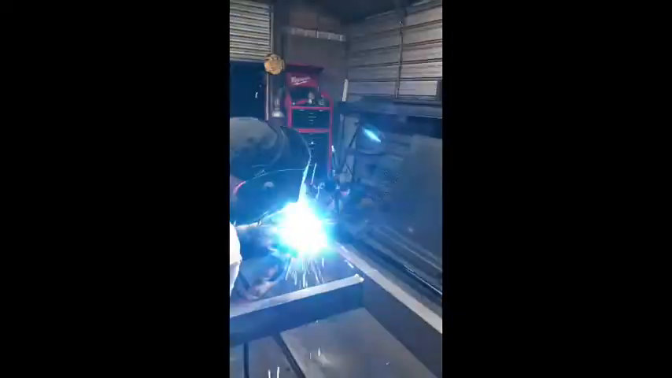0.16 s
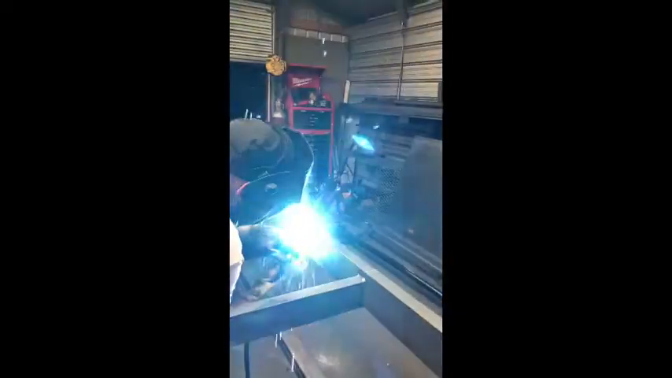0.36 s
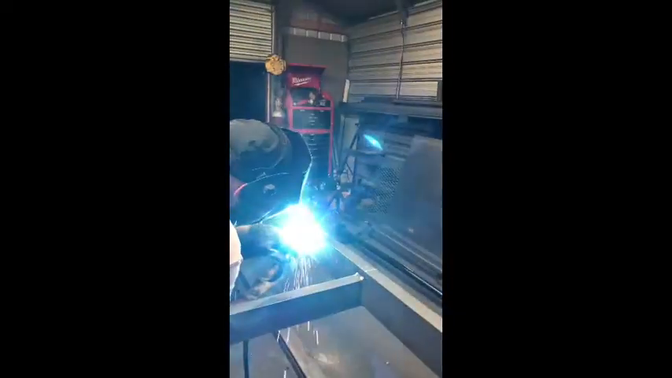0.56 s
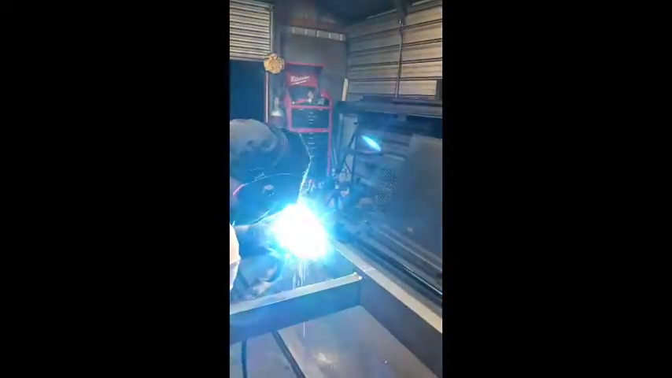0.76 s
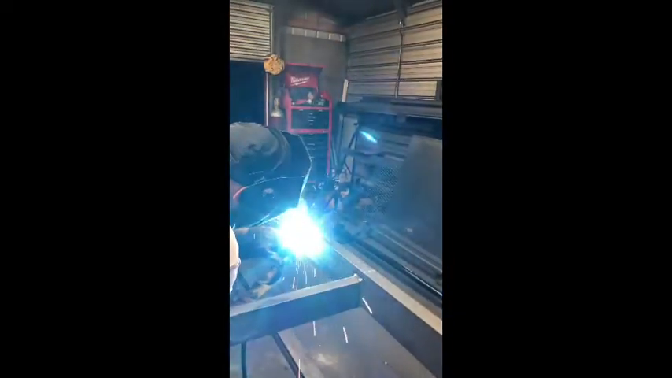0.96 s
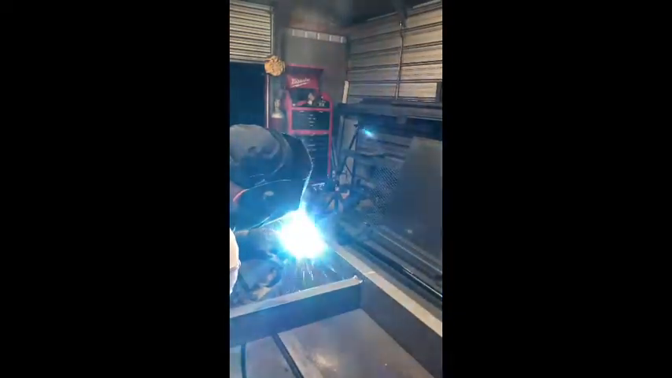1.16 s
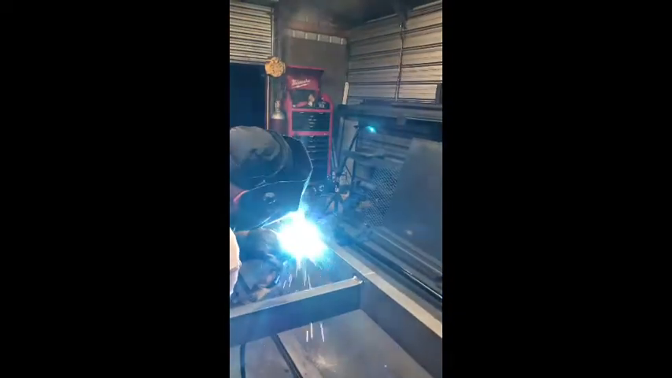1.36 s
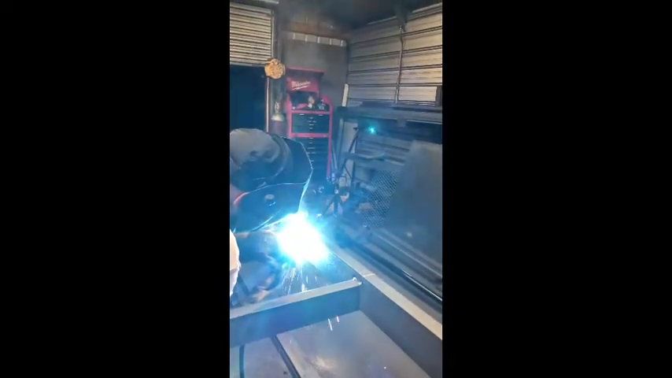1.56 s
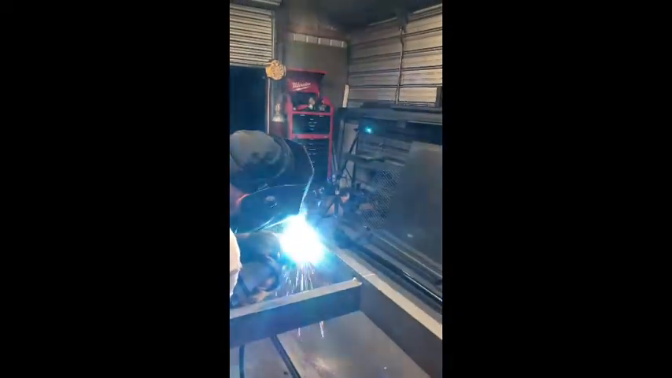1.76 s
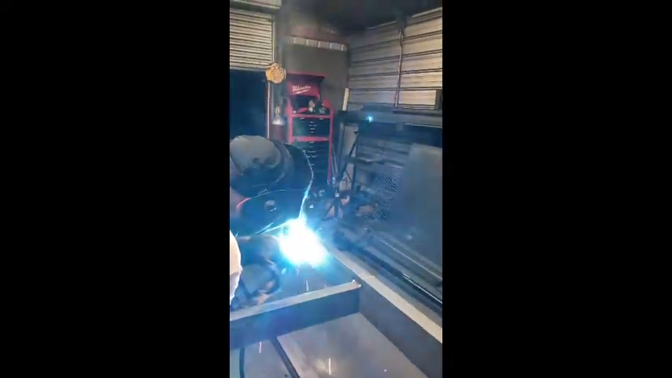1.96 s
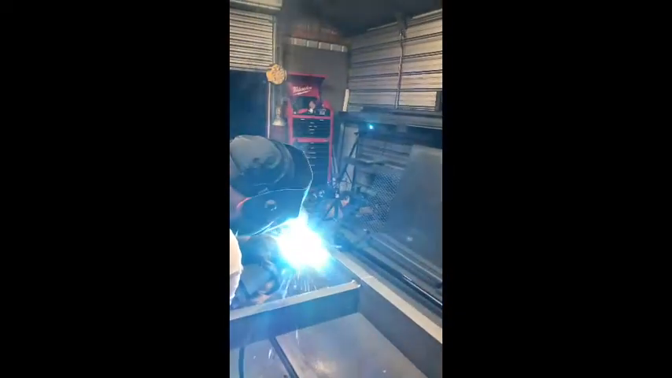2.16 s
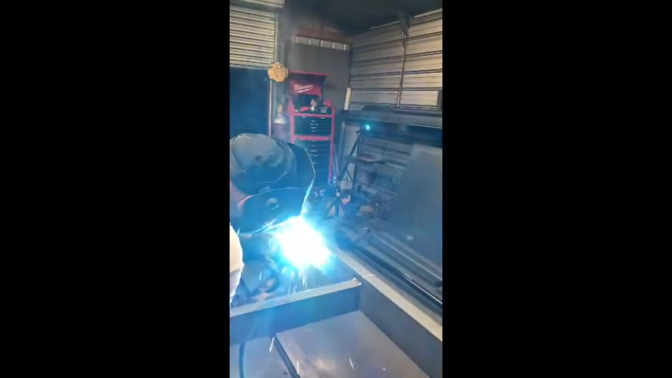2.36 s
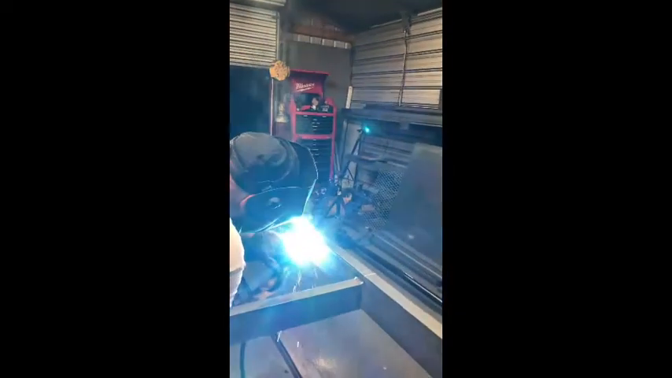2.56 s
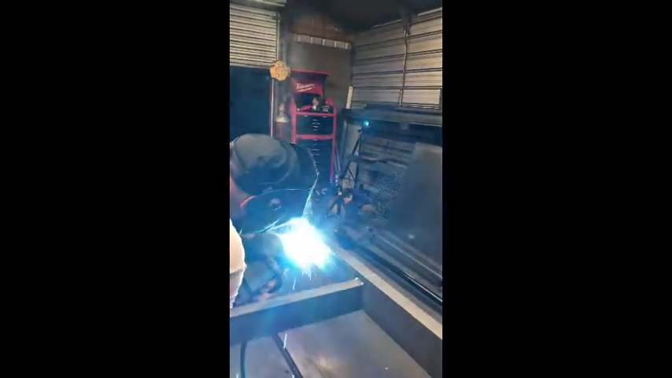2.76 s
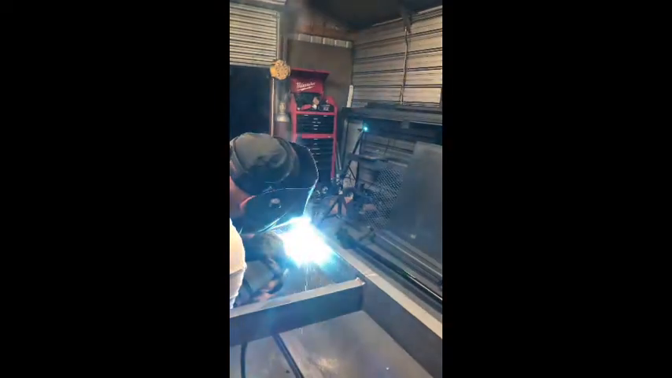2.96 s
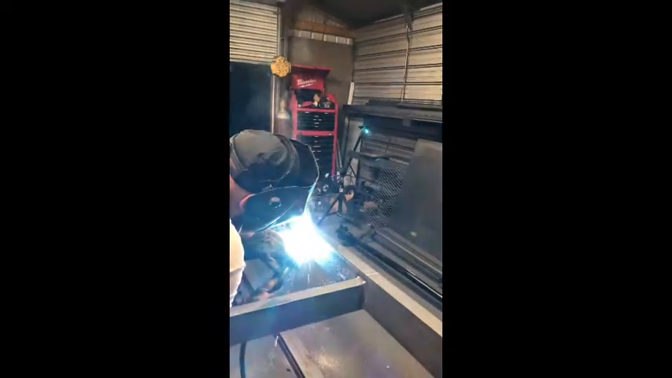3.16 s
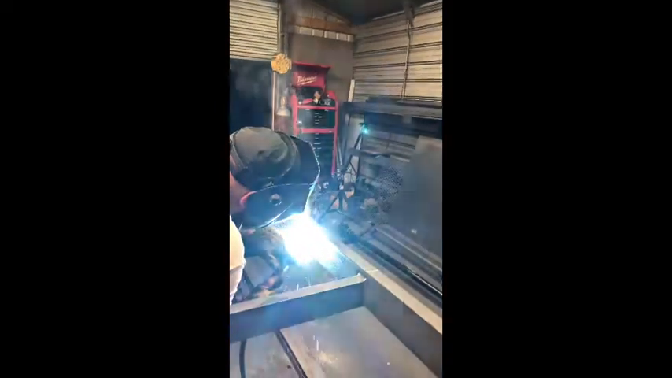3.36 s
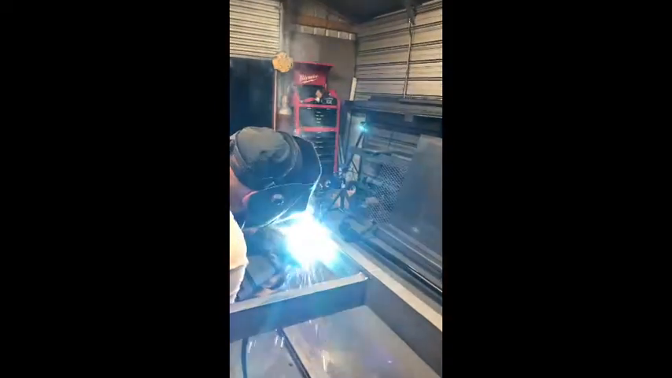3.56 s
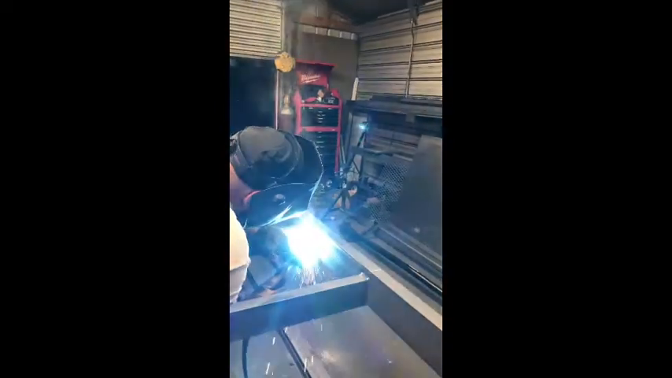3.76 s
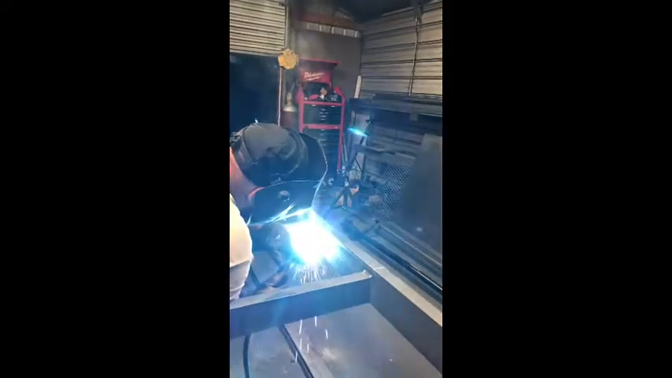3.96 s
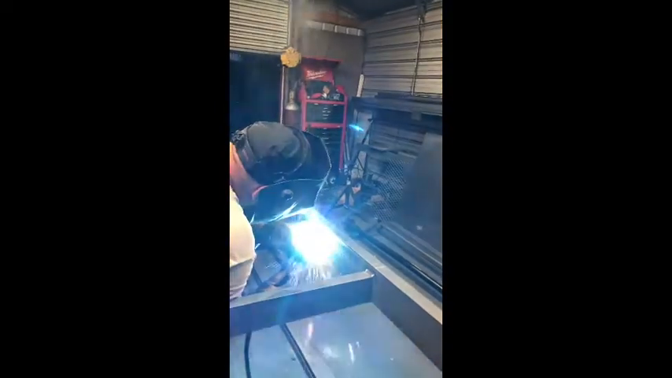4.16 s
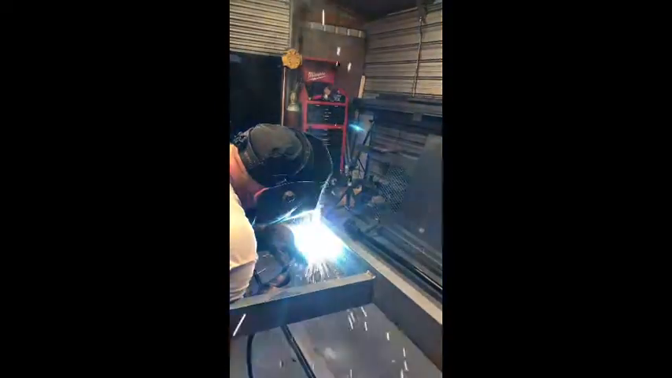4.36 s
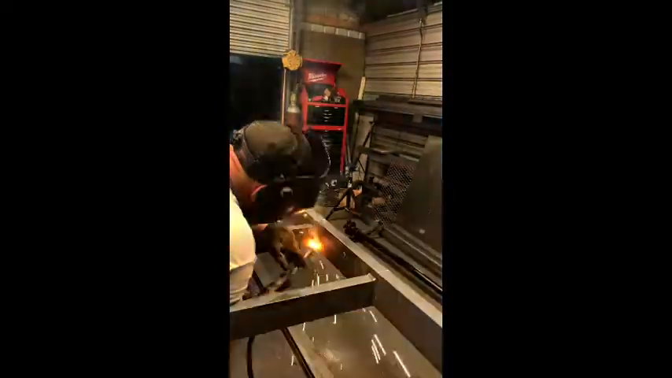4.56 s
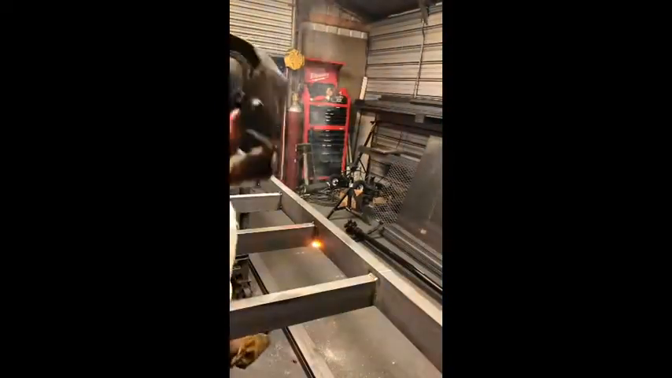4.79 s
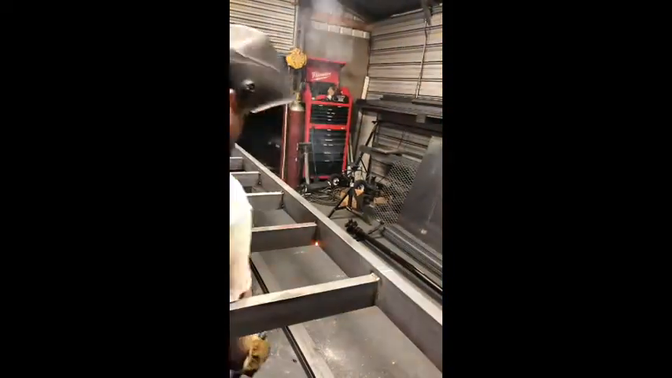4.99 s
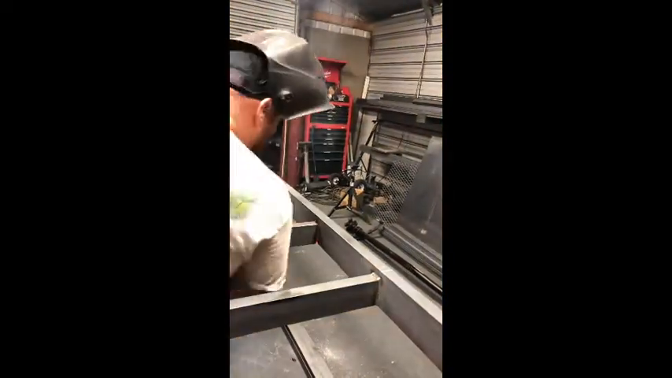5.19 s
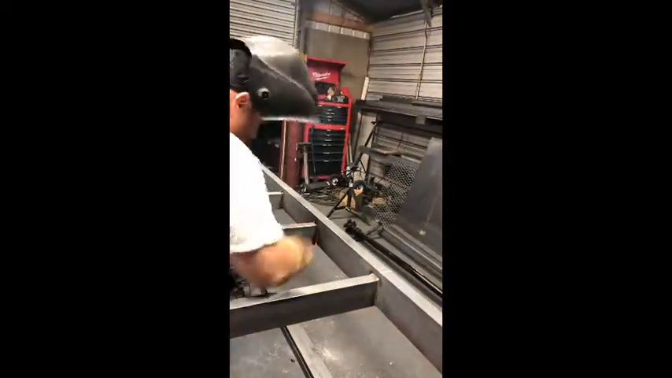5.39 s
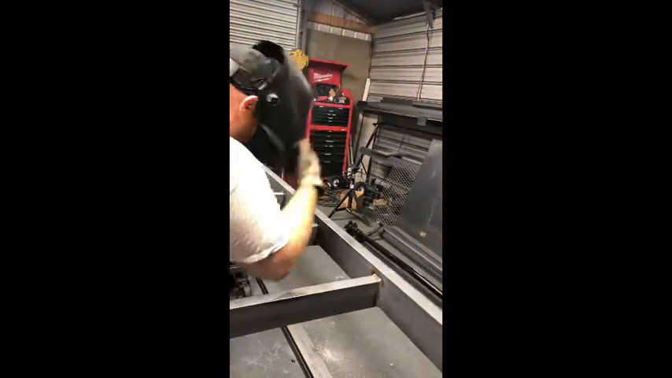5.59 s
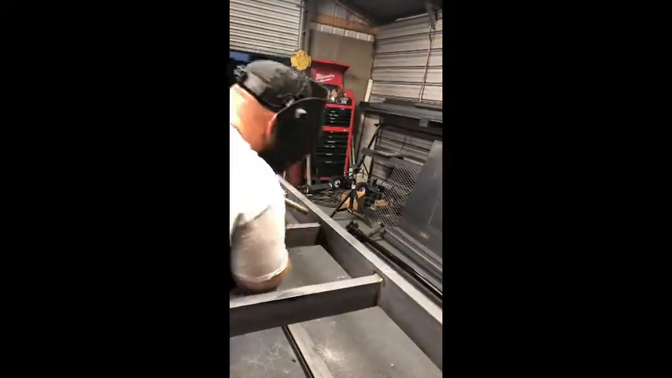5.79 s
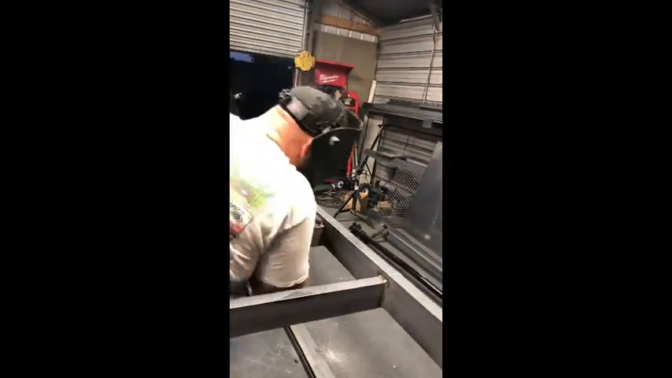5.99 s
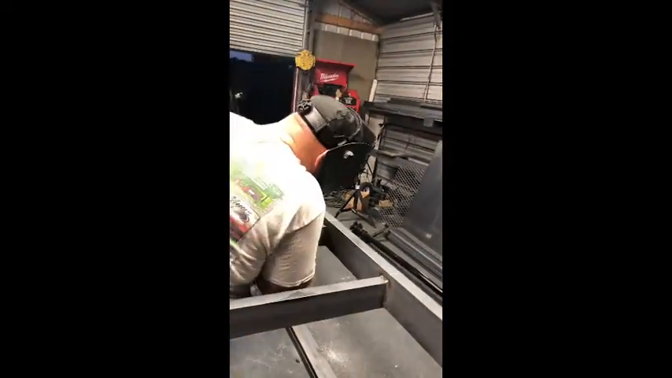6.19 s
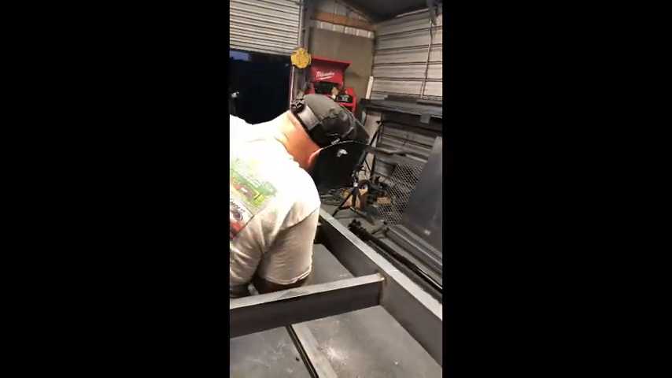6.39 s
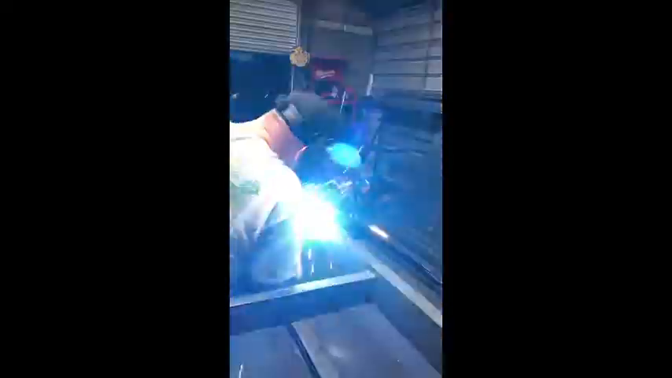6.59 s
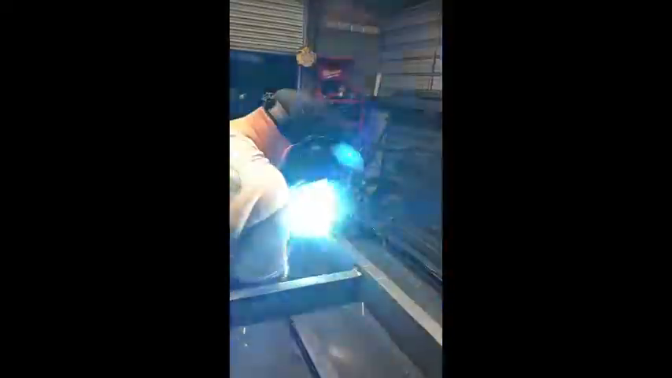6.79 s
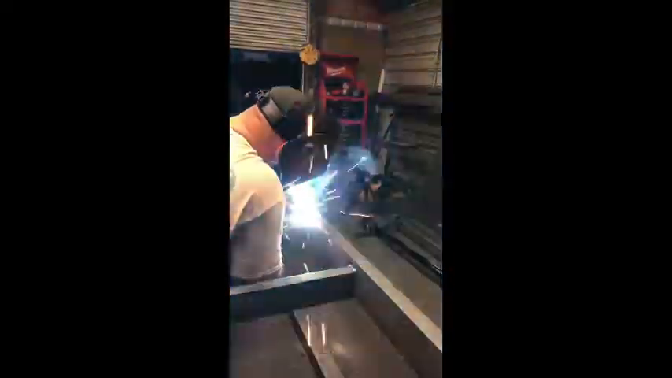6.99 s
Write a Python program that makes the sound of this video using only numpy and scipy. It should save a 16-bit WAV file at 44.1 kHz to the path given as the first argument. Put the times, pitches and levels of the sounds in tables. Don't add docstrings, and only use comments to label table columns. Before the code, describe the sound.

In a sheet-metal workshop, a welding arc burns close to the microphone from the outset, a dense bright hiss with fine crackle and uneven flares. It cuts off sharply after about four and a half seconds. A small gas spit and faint rustles follow over low machine hum and fan air, then the arc strikes again, duller and unsteady, until the end.

```python
import sys
import numpy as np
from scipy import signal
from scipy.fft import rfft, irfft, next_fast_len
from scipy.io import wavfile
from scipy.ndimage import map_coordinates

SR = 44100
rng = np.random.default_rng(int(sys.argv[2]) if len(sys.argv) > 2 else 0)


def nominal_scale(level):
    x = np.asarray(level, float) / 20
    return 10 ** x


def put_to_file(sound):
    columns = np.atleast_2d(sound).T
    safe = np.clip(columns, -1, 1)
    whole_steps = np.round(safe * 32767)
    wavfile.write(sys.argv[1], SR, whole_steps.astype(np.int16))


N = 310464
PAUSE_S = 5.5


def unit(x):
    return x / np.sqrt(np.mean(x ** 2) + 1e-20)


def along(points, hz):
    f, v = np.transpose(points)
    return np.interp(np.log(hz + 1), np.log(f + 1), v)


def curves(rows, t):
    s, *cols = np.transpose(rows)
    return [np.interp(t, s, c) for c in cols]


def bumps(rows, t):
    return sum(db * np.exp(-.5 * ((t - s) / half_s) ** 2) for s, db, half_s in rows)


def wobble(rate_hz):
    knots = rng.standard_normal(int(N * rate_hz / SR) + 4)
    return map_coordinates(knots, [np.arange(N) * rate_hz / SR])


def coloured(x, gain):
    hz, t, z = signal.stft(x, SR, nperseg=1024)
    g = gain(hz[:, None], t)
    return unit(signal.istft(z * g / np.linalg.norm(g, axis=0), SR, nperseg=1024)[1][:N])


def steady(spectrum):
    m = next_fast_len(N)
    gain = nominal_scale(along(spectrum, np.fft.rfftfreq(m, 1 / SR)))
    return unit(irfft(rfft(rng.standard_normal(m)) * gain, m)[:N])


def plasma(drops_hz, flare_s, flare_db, sparks_hz, sparks_db, flicker_db):
    chance = rng.random((4, N))
    drops = (chance[0] < drops_hz / SR) * -np.log(chance[1])
    flare = signal.lfilter([1], [1, -np.exp(-1 / (flare_s * SR))], drops)
    hiss = unit((1 + nominal_scale(flare_db) * flare) * rng.standard_normal(N))
    sparks = unit((chance[2] < sparks_hz / SR) * np.log(chance[3]) * rng.choice([-1, 1], N))
    return nominal_scale(flicker_db * wobble(25)) * (hiss + nominal_scale(sparks_db) * sparks)


# (frequency [Hz], t60 [s])
WALL_DECAY = [(200, 1), (2000, 1), (6000, 0.51), (15000, 0.36)]


def walls(x, size=8192):
    out = np.zeros(N + SR)
    for start in range(0, N, size):
        hz, t, z = signal.stft(rng.standard_normal(SR // 4), SR, nperseg=256)
        decay = nominal_scale(-60 * t / along(WALL_DECAY, hz)[:, None])
        tail = signal.istft(z * decay, SR, nperseg=256)[1]
        answer = signal.fftconvolve(x[start:start + size], tail / np.linalg.norm(tail))
        out[start:start + len(answer)] += answer
    return out[:N]


# (time [s], share of the way [0-1], comb depth [ratio], arm shade [dB])
TRAVEL = [
    (0, 0, 0.63, 1),
    (.6, 0.1, 0.8, 1.5),
    (1, 0.2, 0.98, 2.5),
    (2, 0.63, 0.89, 2.5),
    (2.6, 0.88, 0.91, 5),
    (3, 0.95, 0.86, 8),
    (3.6, 0.9, 0.77, 8.5),
    (4.15, 0.86, 0.68, 0.5),
    (4.7, 0.5, 0.51, 4),
]


def comb(rows, far):
    hz0, db0, hz1, db1 = np.transpose(rows)

    def slid(share, depth):
        return np.transpose([hz0 + share * (hz1 - hz0), depth * (db0 + share * (db1 - db0))])

    def at(hz, s):
        return along(far if s > PAUSE_S else slid(*curves(TRAVEL, s)[:2]), hz)

    return lambda hz, t: np.hstack([at(hz, s) for s in t])


# (time [s], arc power [dB], fullness of the puddle [dB])
FIRST_WELD = [(0, -28.5, -7.5), (.2, -30.5, -3.5), (.44, -30.5, -4.5), (.85, -29, -5), (1.02, -28.5, -4.5),
              (1.39, -28.5, -3), (1.48, -28.5, -2.5), (1.95, -29, -1), (2.06, -28.5, 0), (3.26, -28, -1.5),
              (3.33, -30.5, -2), (3.75, -30, -3.5), (4, -30, -6), (4.26, -30, -4.5), (4.552, -30.5, -6)]


def shadow_db(hz, t):
    share, _, shade_db = curves(TRAVEL, t)
    notch_hz = 11200 + share * (12900 - 11200)
    notch_db = shade_db * np.exp(-.5 * ((hz - notch_hz) / 500) ** 2)
    top_db = (0.42 * shade_db - 1) * np.clip((hz - 11000) / 1500, 0, 1)
    dulls_db_per_khz = 28 * np.clip(t - FIRST_WELD[-1][0], 0, .2)
    loss_db = notch_db + top_db + dulls_db_per_khz * hz / 1000
    return -loss_db * (t < PAUSE_S)


# (frequency [Hz], density [dB/Hz], frequency [Hz], density [dB/Hz])
FIZZ = [(4500, -25, 2800, -38), (5800, -20, 6130, -8), (6330, -6, 7100, -5.5), (6940, -7.5, 8000, 0),
        (7500, 2, 9040, -2.5), (8900, -5, 8700, -8), (9660, 1.5, 10200, -0.5), (10900, -2.5, 11000, 1),
        (11800, -6, 10000, -5), (13000, -8, 12800, -9.5), (14000, -3.5, 13300, -3), (15000, -10, 14400, -7),
        (16000, -7.5, 14600, -12.5)]
# (frequency [Hz], density [dB/Hz])
FIZZ_FAR = [(3410, -18.5), (5800, -9), (7130, -1.5), (9000, -2), (9930, -0.5), (11100, -5), (14300, -7),
            (15600, -10)]


def fizz(source):
    echoes = comb(FIZZ, FIZZ_FAR)
    return coloured(source, lambda hz, t: nominal_scale(echoes(hz, t) + shadow_db(hz, t)))


# (frequency [Hz], density [dB/Hz], frequency [Hz], density [dB/Hz])
SIZZLE = [(1780, -41, 1550, -45), (2230, -19, 2210, -20), (2500, -10, 2760, -13), (3150, -4, 3350, -3),
          (3860, -8.5, 3820, -4.5), (4020, 2, 4150, -1), (4670, -1, 4990, -0.5), (5230, -12, 5420, -8),
          (6000, -20, 5870, -24.5), (7200, -40, 15000, -39)]
# (frequency [Hz], density [dB/Hz])
SIZZLE_FAR = [(1210, -21), (2050, -15.5), (3250, -3), (3690, -6), (4020, -2), (4430, -5), (4750, 0),
              (5800, -11.5), (7540, -17), (12800, -120)]


def sizzle(source):
    echoes = comb(SIZZLE, SIZZLE_FAR)
    return coloured(source, lambda hz, t: nominal_scale(echoes(hz, t)))


# (frequency [Hz], density [dB/Hz])
BODY = [(120, -17), (200, -22.5), (350, -15), (550, -20.5), (800, -13), (1100, -6), (1300, -7), (1500, 1),
        (1680, -5.5), (2000, -20.5), (2500, -26)]


def body(source):
    def pitch(t):
        return np.where(t < PAUSE_S, 1 + 0.037 * (curves(TRAVEL, t)[0] - .5), 1.06)

    return coloured(source, lambda hz, t: nominal_scale(along(BODY, hz / pitch(t))))


def burn(rows, t):
    strike_db_per_s, snuff_db_per_s, snuff_db, snuff_s = 798, 327, 2, 0.025
    power_db, full_db = curves(rows, t)
    early = np.clip(rows[0][0] - t, 0, None)
    late = np.clip(t - rows[-1][0], 0, None)
    fall_db = strike_db_per_s * early + snuff_db_per_s * late + snuff_db * (1 - np.exp(-late / snuff_s))
    return power_db - fall_db, full_db


# (time [s], arc power [dB], fullness of the puddle [dB])
SECOND_WELD = [
    (6.462, -41, -10),
    (6.488, -26, -8.5),
    (6.53, -30.5, -7.5),
    (6.61, -30.5, -7),
    (6.64, -34, -4.5),
    (6.72, -36, -5.5),
    (6.82, -34, -6),
    (6.898, -30.5, -2),
    (7.04, -33, -4.5),
]
# (time [s], change [dB], half length [s])
SURGES = [(.11, -5, 0.022), (.26, -3, 0.014), (.39, 5.5, 0.0063), (.698, -2.8, 0.021), (.743, 1.5, 0.016),
          (1.16, 0, 0.01), (1.387, -2.5, 0.012), (1.482, 4.5, 0.009), (1.545, 2.5, 0.0098),
          (1.611, -2.6, 0.012), (1.67, 0.5, .015), (1.77, 1.5, 0.01), (1.99, -3, 0.022), (2.15, 0.5, 0.018),
          (2.25, 2.5, .015), (2.37, -2, 0.012), (2.454, 0.5, 0.011), (2.74, -2, 0.011), (2.87, -1.5, .03),
          (3.138, 1.9, 0.02), (3.2, -1, .015), (3.258, 1.7, 0.01), (3.342, -1.5, 0.024),
          (3.766, -3.5, 0.014), (3.858, -3.5, .008), (4.006, -2.5, 0.017), (4.075, 1.5, 0.011),
          (4.25, 1.5, .02), (6.84, 2.5, .015), (6.945, -6.5, 0.032)]


def arc():
    t = np.arange(N) / SR
    power_db, full_db = np.where(t < PAUSE_S, burn(FIRST_WELD, t), burn(SECOND_WELD, t))
    surge_db = bumps(SURGES, t)
    source = plasma(drops_hz=300, flare_s=0.0018, flare_db=-16.5,
                    sparks_hz=8000, sparks_db=-11, flicker_db=0.28)
    source = source + nominal_scale(-11) * walls(source)
    fizz_db = 1.5 + 0.46 * surge_db
    sizzle_db = full_db + surge_db
    body_db = -10.5 - 0.43 * t + 0.82 * full_db + 1.17 * surge_db
    ranges = nominal_scale(fizz_db) * fizz(source) + nominal_scale(sizzle_db) * sizzle(source) + nominal_scale(body_db) * body(source)
    return nominal_scale(power_db) * ranges


# (time [s], gain [dB])
GAIN = [(0, -7), (.55, -8.5), (.7, -5.5), (2, -4.5), (3.2, -4), (3.4, -6), (4.2, -3.5), (4.54, -6.5),
        (4.6, -3), (4.72, -.5), (5.4, 0), (6.5, 0.5), (6.61, -11), (6.7, -4), (7.04, -5.5)]
# (time [s], change [dB])
HUM_DIPS = [(.1, -11), (.64, -1), (1.083, 1), (1.716, -12), (2.689, -13), (2.769, -17), (3.278, -20),
            (3.49, -3), (3.677, -13), (3.87, -12), (4.415, -10), (4.958, -16), (5.285, -9), (5.5, -7),
            (5.6, -5), (5.812, -6), (6.454, -13), (6.56, -9), (6.78, -10)]


def hum():
    t = np.arange(N) / SR
    dips_db = bumps([(s, dip_db, 0.0063) for s, dip_db in HUM_DIPS], t)
    db = -38.5 + 1.94 * curves(GAIN, t)[0] + dips_db
    phase = 2 * np.pi * np.cumsum(138.1 + 1.22 * wobble(20)) / SR
    flutter_db = 1 * wobble(25)
    return np.sqrt(2) * nominal_scale(db + flutter_db) * np.sin(phase)


# (frequency [Hz], density [dB/Hz])
AIR = [(110, -18), (170, -3.5), (280, -5.5), (390, -11), (730, -10), (850, -11), (1010, -11), (1900, -17),
       (2600, -21), (4000, -23.5), (6000, -30), (9000, -35.5), (12000, -39), (16000, -47)]
# (frequency [Hz], density [dB/Hz])
RUMBLE = [(20, -50), (35, -33), (60, -16), (95, 7.5), (120, 8.5), (170, 3), (230, -33.5), (300, -120)]


def shop():
    air = nominal_scale(-46.5 + 0.23 * wobble(4.8)) * steady(AIR)
    rumble = nominal_scale(-49.5 + 1.8 * wobble(4.5)) * steady(RUMBLE)
    return nominal_scale(curves(GAIN, np.arange(N) / SR)[0]) * (air + rumble)


# (time [s], level [dB], half length [s], top frequency [Hz])
PUFFS = [(0.004, -36, 0.0065, 130), (0.035, -33, 0.017, 690), (.062, -38, 0.0061, 60),
         (0.309, -36, .009, 80), (0.344, -32.5, 0.0081, 700), (.36, -21.5, 0.0036, 400),
         (.362, -33.5, .014, 1100), (0.363, -24.5, 0.0095, 79.5), (0.381, -27, 0.0043, 70),
         (0.384, -38, 0.005, 800), (0.517, -49, .012, 60), (3.28, -43, 0.0074, 59.9),
         (4.43, -37, 0.01, 70.2), (4.444, -36, 0.0049, 500), (4.455, -33, 0.0043, 800),
         (4.462, -32.5, 0.0065, 300), (4.467, -34, 0.0025, 130), (4.474, -43, 0.0036, 70),
         (6.562, -36.5, .008, 111.4)]


def puffs():
    out = np.zeros(N + SR)
    t = np.arange(-4096, 4096) / SR
    f = np.fft.rfftfreq(len(t), 1 / SR)
    for s, db, half_s, top_hz in PUFFS:
        colour = f / (f + 25) / (1 + (f / top_hz) ** 2)
        gust = irfft(rfft(rng.standard_normal(len(t))) * colour)
        swell = np.exp(-.5 * (t / half_s) ** 2)
        rms = np.sqrt(np.sum((swell * gust) ** 2) / np.sum(swell ** 2))
        out[round(s * SR):][:len(t)] += nominal_scale(db) * swell * gust / rms
    return out[4096:][:N]


# (time [s], level [dB], rise [s], centre [Hz], width [Hz])
TICKS = [
    (4.73, -45.5, 0.0099, 9700, 13000),
    (4.738, -50, 0.015, 5000, 5000),
    (4.758, -47, .01, 503, 250.7),
    (5.07, -65, .025, 11000, 9000),
    (5.31, -73, .01, 11000, 8000),
    (5.415, -58, .008, 5200, 2500),
]


def ticks():
    t = np.arange(N) / SR
    out = np.zeros(N)
    for s, db, rise_s, hz, width_hz in TICKS:
        band = steady([(max(hz - width_hz, 200), -25), (hz - width_hz / 3, 0),
                       (hz + width_hz / 3, 0), (hz + width_hz, -25)])
        u = (t - s) / rise_s
        swell = np.where(u < 0, np.exp(-.5 * u ** 2), np.exp(-np.abs(u) / 2.0))
        out += nominal_scale(db) * swell * band
    return out


def scene():
    return np.tile(arc() + hum() + shop() + puffs() + ticks(), (2, 1))


def band_limit(x):
    return signal.sosfilt(signal.butter(12, 16090, fs=SR, output="sos"), x)


# (time [s], low edge [Hz], high edge [Hz])
LOOSE_BANDS = [(4.1, 14500, 15700), (6.37, 13100, 15700), (0.104, 6200, 7620), (0.107, 11060, 12440),
               (1.036, 6800, 8350), (3.685, 6890, 8260), (3.73, 8870, 10420), (3.73, 13690, 15240),
               (3.904, 4600, 8310), (4.169, 7570, 9000), (5.82, 7530, 9680), (6.145, 4560, 5770),
               (6.307, 4170, 5720), (6.307, 10980, 12480), (6.632, 4560, 5770), (6.634, 9600, 11750),
               (6.634, 13130, 14470), (6.796, 11620, 13170), (6.956, 11670, 13820), (6.957, 6890, 9640)]


def record(dry):
    dry = signal.sosfilt(signal.butter(2, 36, "high", fs=SR, output="sos"), dry)
    hz, t, z = signal.stft(dry, SR, nperseg=1024)
    loose = np.zeros(z.shape[1:])
    for s, low_hz, high_hz in LOOSE_BANDS:
        in_band = (hz > low_hz) & (hz < high_hz)
        loose += np.outer(in_band, np.clip(1.6 - abs(t - s) / 0.0081, 0, 1))
    turn = np.exp(2j * np.pi * np.clip(loose, 0, 1) * (rng.random(z.shape) - .5))
    passed = (hz < 15760)[:, None]
    wide = signal.istft(z * turn * nominal_scale(3.3 * loose) * passed, SR, nperseg=1024)[1][:, :N]
    return band_limit(wide)


dry = scene()
out = record(dry)
put_to_file(out)
```